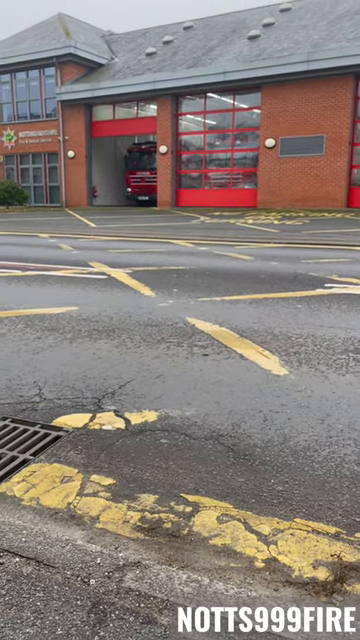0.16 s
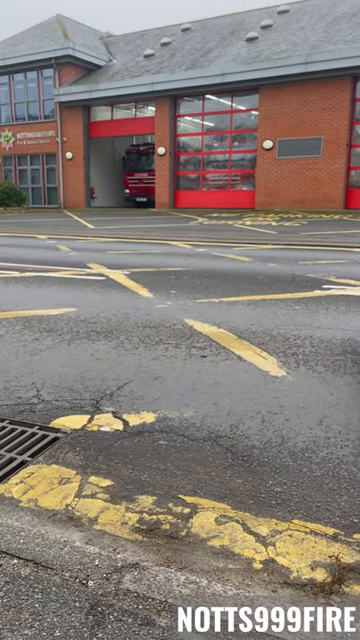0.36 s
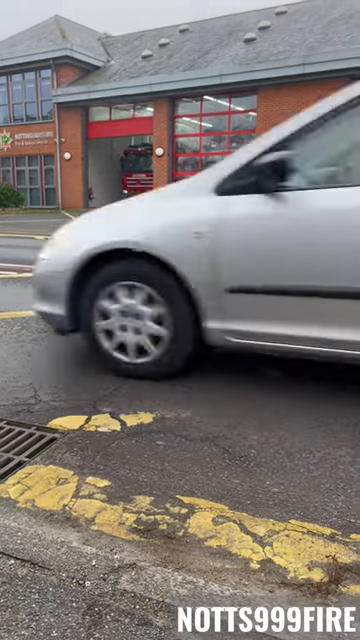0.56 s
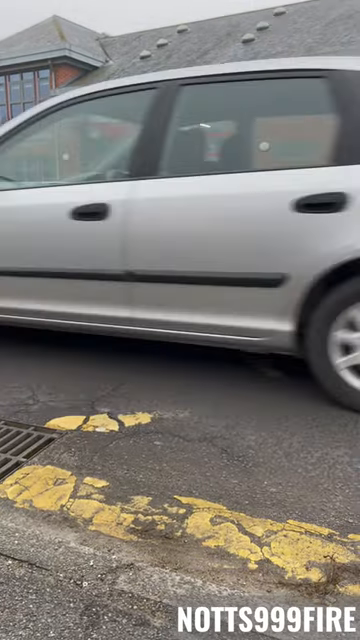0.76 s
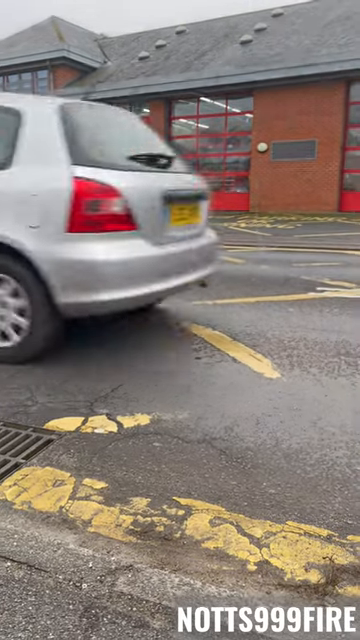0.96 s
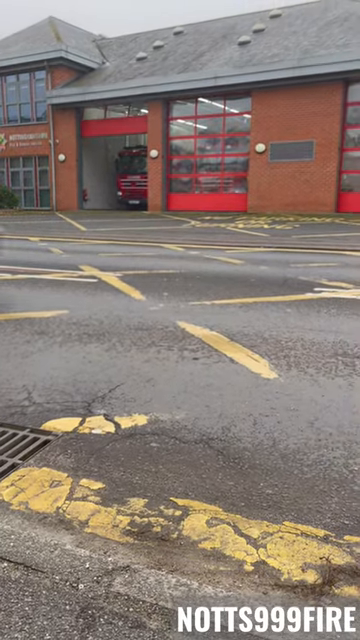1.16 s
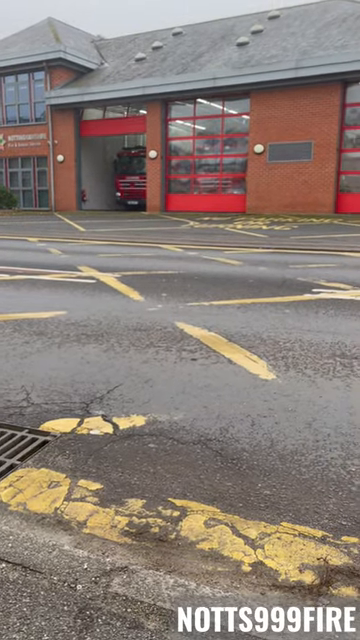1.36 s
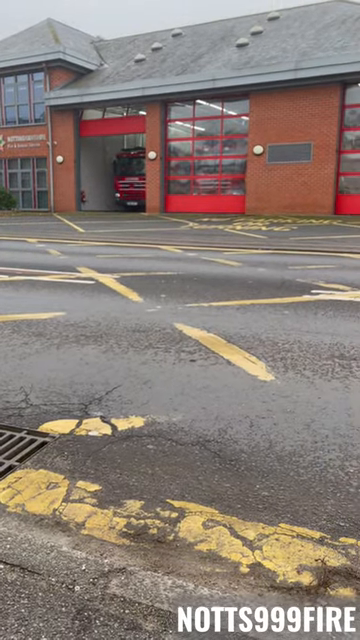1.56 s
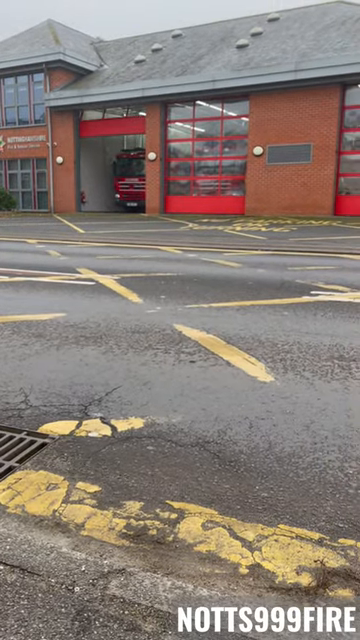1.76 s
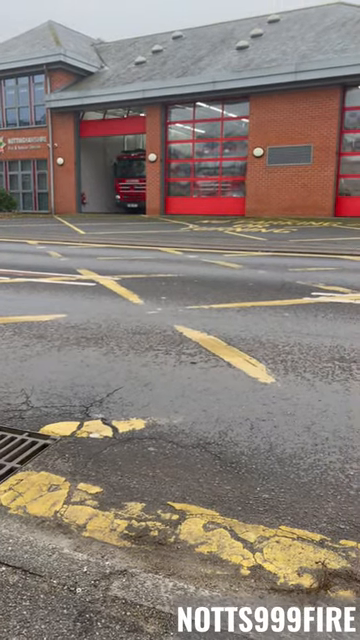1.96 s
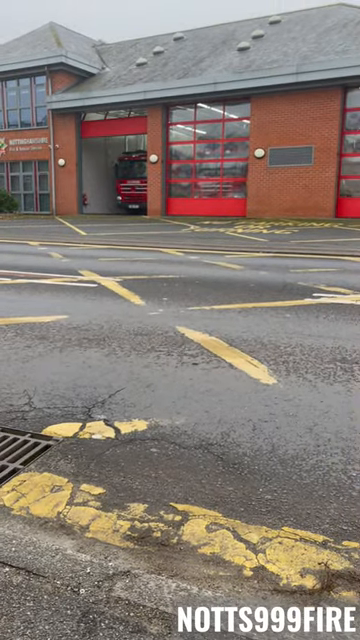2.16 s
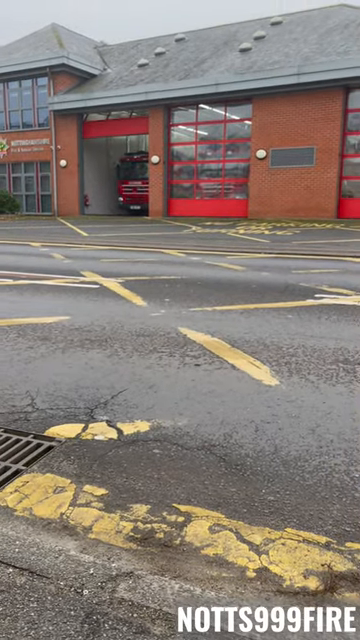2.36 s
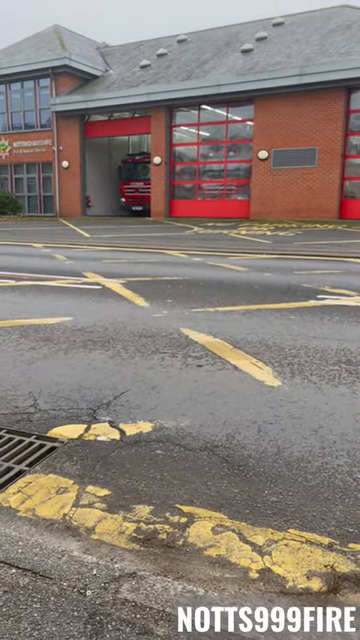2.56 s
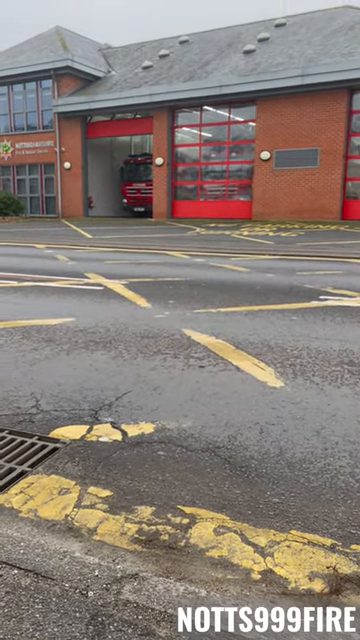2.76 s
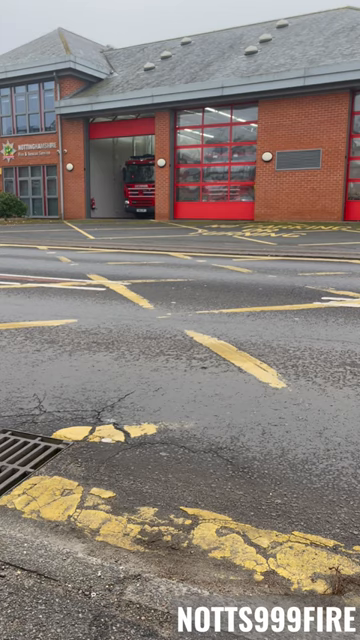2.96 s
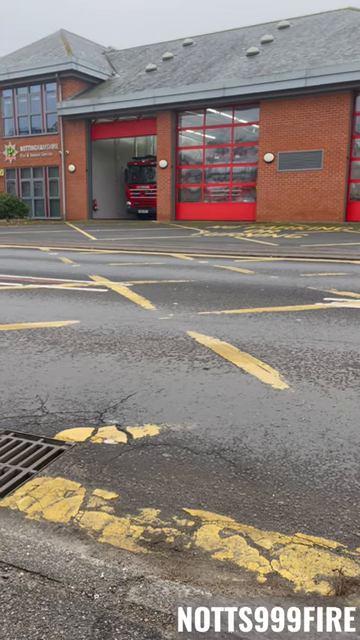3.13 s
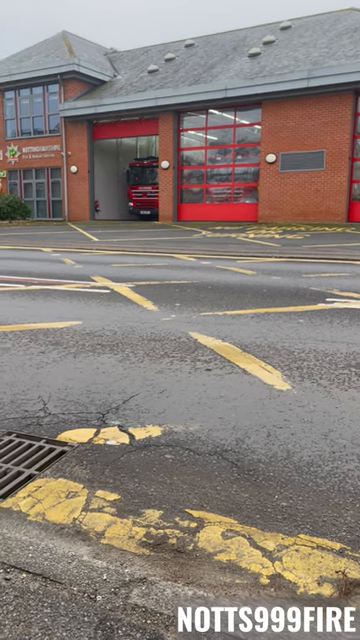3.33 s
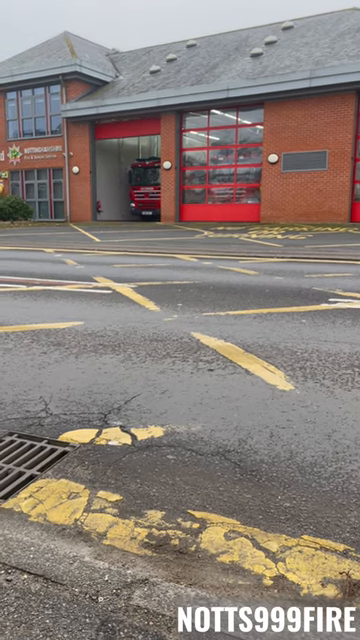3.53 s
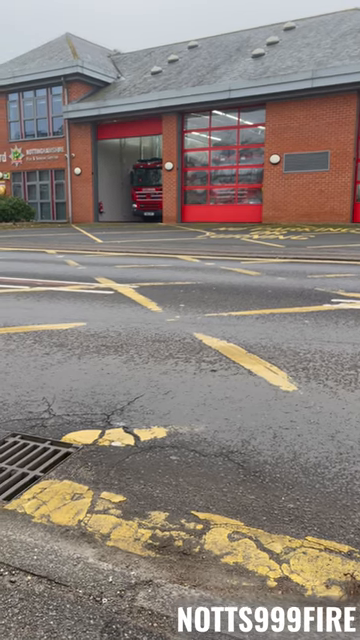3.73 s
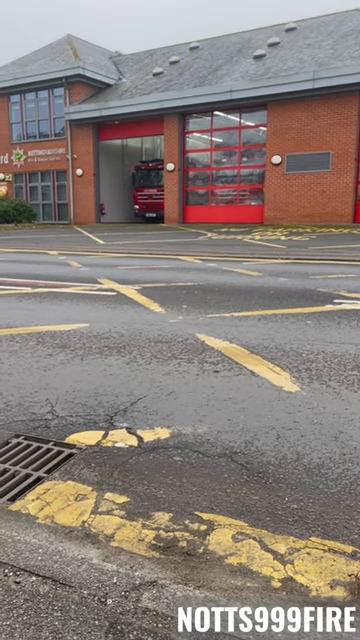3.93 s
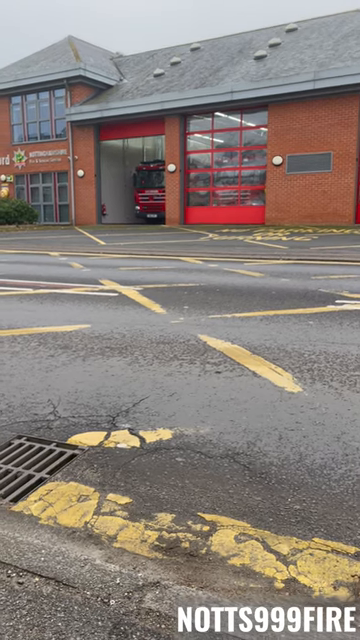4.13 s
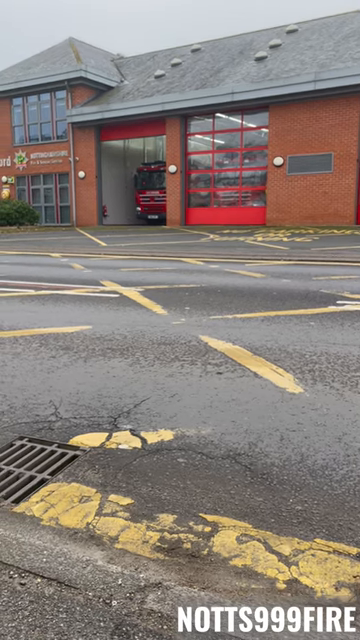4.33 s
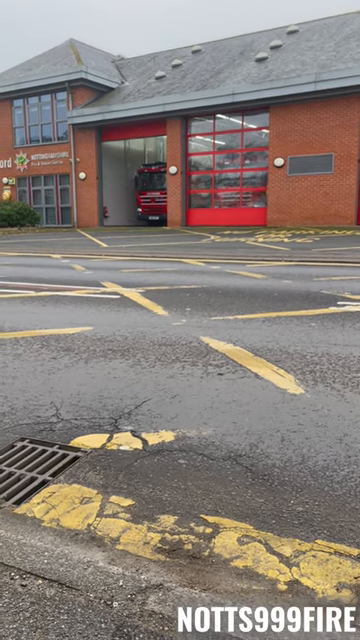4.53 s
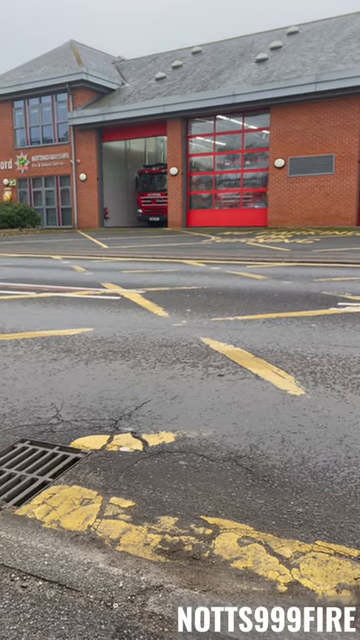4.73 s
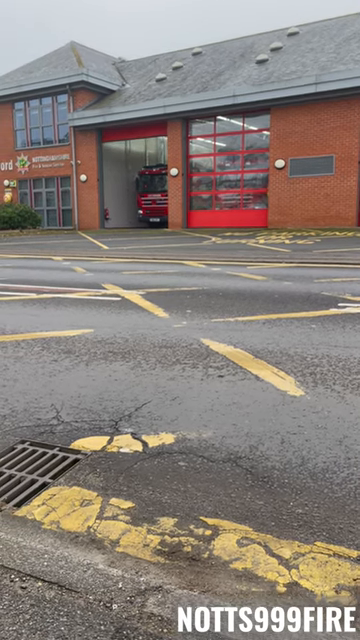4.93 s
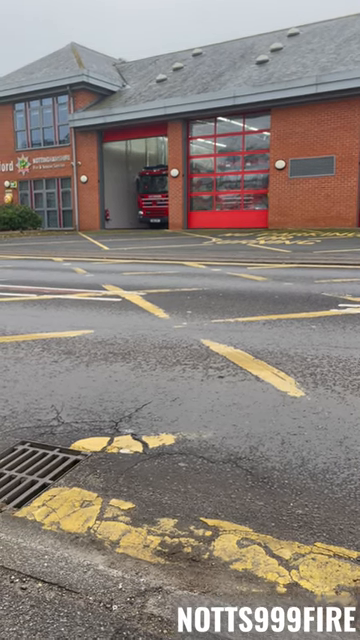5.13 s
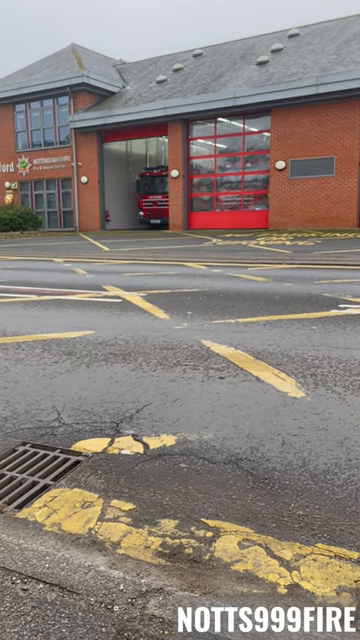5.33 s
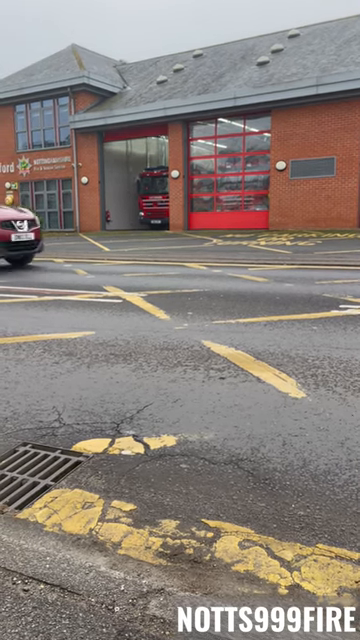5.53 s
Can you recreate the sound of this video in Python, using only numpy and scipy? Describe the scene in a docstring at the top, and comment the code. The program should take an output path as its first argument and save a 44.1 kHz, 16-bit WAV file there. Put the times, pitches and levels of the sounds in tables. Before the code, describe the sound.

A wet roadside in stereo, with steady far traffic underneath. At about 0.5 s a car passes very close, from the right towards the centre: broad tyre roar, body rumble, singing tread, fine spray and swishes that brighten as it leaves by 1.5 s. A tyre slap sounds near 1.6 s, with occasional tiny grit ticks. A low, almost pure engine drone around 50 Hz comes in uneven swells, strongest about 2.4 s, fading by 3 s. A fire engine's diesel across the road becomes clearer, clattering with low rumble. A faint, thin airy whistle shows around 3.5-4 s, leaning left. A dull thud lands at 3.7 s; at 4.2 s the air brake spits sharply with clunks and clustered booming thuds. A thin squeal near 7 kHz glides down, flutters and echoes from 4.3 to 5.2 s, with more thuds. Another car's wet roar grows to the end at 5.6 s.

```python
"""A car passes close on a wet road, from the right to straight ahead: tyre noise bands and spray.
A low engine drone (near-pure tone) comes in swells. Across the road a fire engine's diesel clatters in its bay:
noise pulsed by the firings, plus low notes. Its air brake spits and clunks (short noise bursts), thuds boom
(decaying sines), and the brakes squeal thinly (a gliding tone with echoes).
Steady traffic noise lies behind, and another car draws near."""
import sys
import numpy as np
from scipy import signal
from scipy.fft import rfft, irfft, next_fast_len
from scipy.io import wavfile

SR = 44100
rng = np.random.default_rng(int(sys.argv[2]) if len(sys.argv) > 2 else 0)


def materialize(psi):
    """Save the field psi as 16-bit PCM at rate SR to the path in sys.argv[1].

    A 1-D psi becomes a single channel; in a 2-D psi each row is a channel.
    """
    bounded = np.clip(np.atleast_2d(psi).T, -1, 1)
    quanta = np.round(bounded * 32767).astype(np.int16)
    wavfile.write(sys.argv[1], SR, quanta)


N = 246519
TIME = np.arange(N) / SR
SIZE = next_fast_len(N + 2000)
HZ = np.maximum(np.arange(SIZE // 2 + 1) * SR / SIZE, 1)

# car position: time_s, right_share (1 = far right, 0 = straight ahead)
CAR_RIGHT_SHARE = [(0, 1), (.45, .95), (.8, .4), (1.1, .12), (1.6, 0)]
# swell and fade of each part of the car: nearest_s, level_db, half_width_s, loss_db_per_decade of distance
ROAR_PASS = (0.51, -28, 0.49, 30.5)
HISS_PASS = (0.56, -31, 1.05, 84.5)
BODY_PASS = (0.68, -27.5, 0.83, 65)
SPRAY_PASS = (0.5, -44.5, 0.79, 59)
# noise colours of tread roar, tread hiss, body and spray: freq_hz, relative_db
ROAR_COLOUR = [(300, -21), (450, -1.5), (680, -1), (950, 0.5), (1400, -5), (2000, -15)]
HISS_COLOUR = [(900, -26), (1500, -1), (2000, -0.5), (2600, -2.5), (3200, -9.5), (4000, -12.5),
               (4800, -19.5), (7000, -31)]
BODY_COLOUR = [(25, -29), (70, -1), (110, -6), (165, -6.5), (235, -1.5), (305, 4), (400, -11), (700, -12)]
SPRAY_COLOUR = [(2500, -3), (4500, -2), (6200, 1), (8500, -0.5), (10000, 3), (10900, 2.5), (11800, -12),
                (12600, -26)]
# band where the tread sings: time_s, centre_hz
SINGING_PITCH = [(.3, 1060), (.6, 980), (.72, 900), (1.1, 900), (1.45, 1060)]
# its surges: nearest_s, level_db, half_width_s, loss_db_per_decade
SINGING_SURGES = [(.36, -35.5, .16, 38), (.605, -29, 0.04, 37), (.67, -28.5, .045, 37),
                  (.785, -32, .02, 35), (1.05, -35, .025, 35), (1.27, -38, .03, 35),
                  (1.47, -37.5, 0.06, 19)]
# wet swish, brighter as the car draws away: time_s, centre_hz
SWISH_CENTRE = [(.33, 1900), (.49, 1500), (.57, 2050), (.8, 1954), (.97, 2348), (1.12, 2750), (1.35, 3403)]
# wheels swishing past: nearest_s, level_db, half_width_s, loss_db_per_decade
SWISH_SURGES = [(.335, -33, 0.038, 40), (.5, -30, 0.046, 51), (.572, -30, .028, 49), (.78, -35, 0.076, 40),
                (.95, -33, 0.12, 41)]
# shading of sound from the right by the microphone body: freq_hz, left_minus_right_db
RIGHT_BALANCE = [(150, -.3), (330, -1.3), (650, -4.5), (1100, -6), (1550, -1.2), (1900, 0), (2350, 5),
                 (2750, 1), (3500, -2), (4700, -3.5), (5500, 0)]
# phase of sound from the right: freq_hz, left_lead_rad
RIGHT_LEAD = [(150, -.1), (350, -.35), (520, -.85), (950, -1), (1250, -.7), (1600, -.25), (2000, -.3),
              (2400, -1.1), (2900, -1.3), (3600, -1), (5000, 0)]


def near_car(grain=0.16, crackle=0.37):
    """Tread roar and hiss, body rumble and spray off wet tyres, each falling with distance."""
    right, = in_time(CAR_RIGHT_SHARE)
    splashes = droplets(per_s=3100, size_db=3.0, decay_s=0.0011) - 1
    roar = passing(*ROAR_PASS) * noise(ROAR_COLOUR, band=(500, 1400))
    hiss = passing(*HISS_PASS) * (1 + crackle * splashes) * noise(HISS_COLOUR, band=(1600, 3500))
    body = passing(*BODY_PASS) * noise(BODY_COLOUR, band=(130, 420))
    spray = passing(*SPRAY_PASS) * (1 + grain * splashes) * noise(SPRAY_COLOUR, band=(5500, 7500))
    singing = tyre_band(SINGING_PITCH, SINGING_SURGES, width_hz=140.0)
    swish = tyre_band(SWISH_CENTRE, SWISH_SURGES, width_hz=450.0)
    car = roar + singing + hiss + swish + body + spray
    return shaded(right * car, RIGHT_BALANCE, at_hz(RIGHT_LEAD)) + (1 - right) * car


# drone pitch: time_s, pitch_hz
DRONE_PITCH = [(0, 54), (.7, 57), (.95, 55.3), (1.44, 54), (1.6, 51.4), (2.05, 52), (2.7, 52.7), (3.15, 55),
               (3.7, 47), (5.0, 50)]
# drone in swells, loudest about 2.4 s, faint from 2.95 s: time_s, level_db
DRONE_SWELLS = [(0, -28), (.38, -24.5), (.48, -26), (.54, -35), (.61, -25), (.85, -21), (1.25, -25),
                (1.41, -23), (1.6, -26.5), (1.9, -32.5), (1.99, -23.5), (2.3, -20), (2.5, -20), (2.78, -30),
                (2.95, -42), (3.15, -35), (4.0, -36), (4.7, -45), (5.3, -40), (5.59, -41)]
# low burble: loudest_s, level_db, half_width_s, loss_db_per_decade
BURBLE_SWELL = (2.5, -39.5, 0.74, 32)
# burble noise: freq_hz, relative_db
BURBLE_COLOUR = [(125, -2), (168, 2), (200, -1.5), (265, -1), (325, -3), (380, -10)]


def engine_drone(second_db=-7.5, third_db=-15.0, waver_db=1.14, richest_s=0.73, dulling_db_per_s=32.0):
    """Low, nearly pure tone in swells; two overtones sound only around richest_s, and a burble swells later."""
    pitch_hz, = in_time(DRONE_PITCH)
    drone_db, = in_time(DRONE_SWELLS)
    angle = 2 * np.pi * turns(pitch_hz * (1 + 0.0033 * drift(6.1)))
    first, second, third = np.sin(np.outer([1, 2, 3], angle))
    richness = from_db(-dulling_db_per_s * np.abs(TIME - richest_s))
    overtones = from_db(second_db + 2 * drift(2.1)) * second + from_db(third_db) * third
    drone = from_db(drone_db + waver_db * drift(2.6)) * (first + richness * overtones)
    return drone + passing(*BURBLE_SWELL) * noise(BURBLE_COLOUR)


# tyre slaps in wet patches: start_s, level_db, decay_s
PUDDLE_SLAPS = [(.565, -38, .03), (1.575, -30.5, 0.021)]


def puddles():
    """Water pressed out of the tread: brief bursts of tread-coloured hiss."""
    return bursts(PUDDLE_SLAPS, HISS_COLOUR, rise_s=0.0055)


# stone ticks: start_s, relative_db
GRIT_TICKS = [(.6175, -16), (.999, -27), (1.494, -24), (3.376, -22.5), (4.659, -28)]
# tick noise: freq_hz, relative_db
TICK_COLOUR = [(2500, -12), (5000, -1), (6500, 0), (8500, 3), (10000, 2), (12000, -10)]


def grit(level_db=-10.5, decay_s=0.0017):
    """Small stones tick on the road: very short bright bursts."""
    ticks = [(start_s, relative_db + level_db, decay_s) for start_s, relative_db in GRIT_TICKS]
    return bursts(ticks, TICK_COLOUR, rise_s=.0002)


# diesel speed: time_s, firing_rate_hz
DIESEL_FIRING_RATE = [(0, 35.2), (2.4, 34), (3.5, 34.4), (4.1, 32.5), (4.5, 33.3), (5.1, 33.6),
                      (5.59, 32.2)]
# diesel under load: time_s, clatter_db, rumble_db, notes_db
DIESEL_LOAD = [(0, -52.5, -41, -42), (2.6, -49.5, -41.5, -43), (2.9, -47, -39.5, -41),
               (4.0, -44, -34.5, -39.5), (5.0, -42.5, -36, -38), (5.37, -43, -40.5, -33.5),
               (5.59, -42, -38, -36)]
# exhaust notes: firing_rate_multiple, relative_db
DIESEL_NOTES = [(2, 1), (3, 0.5), (5, -9.5), (6, -13), (8, -11.5)]
# clatter and exhaust rumble noise: freq_hz, relative_db
CLATTER_COLOUR = [(600, -21), (1500, -6), (2600, 1.5), (3900, 2), (5000, -5), (6300, -3.5), (7500, -3),
                  (8800, -11.5), (10600, -2), (11800, -22), (13000, -84)]
RUMBLE_COLOUR = [(25, -12), (50, -10), (75, -0.5), (105, -3), (135, -6.5), (180, -6.5), (300, -16.5),
                 (600, -22.5)]
# shading of sound from the bay by the microphone body: freq_hz, left_minus_right_db
BAY_BALANCE = [(1900, 0), (2300, 0), (2900, 9), (3700, -1), (4400, 3), (4900, 0), (5500, 1.5), (5900, 0)]


def diesel():
    """Each firing knocks and bay echo fills the gaps; the exhaust adds wavering low notes and a rumble."""
    rate_hz, = in_time(DIESEL_FIRING_RATE)
    clatter_db, rumble_db, notes_db = in_time(DIESEL_LOAD)
    knocks = firing_knocks(knock_s=0.0099, rise_s=0.004, uneven_db=3.0, between=0.54)
    clatter = shaded(from_db(clatter_db) * knocks * noise(CLATTER_COLOUR), BAY_BALANCE)
    notes = 0
    for multiple, relative_db in DIESEL_NOTES:
        angle = 2 * np.pi * (multiple * turns(rate_hz) + rng.random()) + 0.63 * drift(7.1)
        gain = from_db(relative_db + notes_db + 3.1 * drift(4.2))
        notes = notes + np.sqrt(2) * gain * np.sin(angle)
    return clatter + notes + from_db(rumble_db) * noise(RUMBLE_COLOUR)


def firing_knocks(knock_s, rise_s, uneven_db, between):
    """Envelope of diesel firings, each of its own strength, over a steady share; rms 1."""
    rate_hz, = in_time(DIESEL_FIRING_RATE)
    firings = turns(rate_hz)
    number = firings.astype(int)
    age_s = firings % 1 / rate_hz
    strength = from_db(uneven_db * rng.standard_normal(size=400))[number]
    knocks = between + strength * (1 - np.exp(-age_s / rise_s)) * np.exp(-age_s / knock_s)
    return knocks / np.sqrt(np.mean(knocks ** 2))


# valve spits: start_s, level_db, decay_s
AIR_SPITS = [(4.1685, -17, 0.0015), (4.1735, -32, 0.004), (4.1812, -26, 0.004), (4.1845, -19.5, 0.0055),
             (4.1985, -22, 0.0035), (4.2065, -28, .003), (4.207, -40.5, 0.052), (4.2445, -33, .002)]
# linkage clunks: start_s, level_db, decay_s
LINKAGE_CLUNKS = [(4.171, -22, 0.03), (4.19, -27.5, 0.035)]
# spit and clunk noise: freq_hz, relative_db
SPIT_COLOUR = [(1200, -13), (2500, 3), (3300, -9), (4500, 0), (5400, -5.5), (6500, 1), (8000, 5.5),
               (9300, -8), (10100, 11.5), (11200, 5.5), (12200, 3)]
LINKAGE_COLOUR = [(200, -3), (550, 1.5), (800, -1), (1250, -3.5), (1700, -15), (4000, -18)]


def brake_release(sputter=0.48):
    """Air sputters from the valve in sharp spits and the linkage clunks."""
    rough = 1 + sputter * (droplets(per_s=2500, size_db=1.0, decay_s=.0005) - 1)
    air = shaded(rough * bursts(AIR_SPITS, SPIT_COLOUR, rise_s=0.00067), BAY_BALANCE)
    return air + bursts(LINKAGE_CLUNKS, LINKAGE_COLOUR, rise_s=0.0035)


# dull thuds in the bay: start_s, level_db, decay_s, boom_tilt_db_per_octave
BAY_THUDS = [(3.712, -19.5, 0.027, -15), (4.1973, -19, 0.035, 1), (4.2315, -22.5, 0.044, 1),
             (4.268, -21, 0.037, -2.5), (4.352, -23.5, 0.038, -3), (4.409, -27, 0.035, -9),
             (4.765, -20.5, 0.034, -5), (4.985, -26.5, 0.037, 2)]
# low notes set booming: freq_hz, relative_db
BAY_MODES = [(85, 1.5), (112, -5), (150, -8), (176, -4.5), (238, -6)]
# rattle noise: freq_hz, relative_db
RATTLE_COLOUR = [(40, -9), (70, -4), (130, 1), (175, 1.5), (245, -3), (310, -8), (400, -12), (800, -15)]


def thuds(boom_db=-0.5, rattle_db=-6.0, rise_s=0.0035, uneven_db=1.0):
    """Each thud sets the low notes of the bay booming, with a dull rattle."""
    mode_hz, mode_db = np.transpose(BAY_MODES)
    boom = np.zeros(N)
    for start_s, level_db, decay_s, tilt_db in BAY_THUDS:
        start = int(start_s * SR)
        age_s = TIME[:min(N - start, SR // 2)]
        tilted_db = mode_db + tilt_db * np.log2(mode_hz / mode_hz[0])
        colour_db = tilted_db + uneven_db * rng.standard_normal(len(mode_hz))
        ringing = from_db(level_db + boom_db + colour_db) @ np.sin(2 * np.pi * np.outer(mode_hz, age_s))
        boom[start:start + len(age_s)] += (1 - np.exp(-age_s / rise_s)) * np.exp(-age_s / decay_s) * ringing
    rattle = bursts([row[:3] for row in BAY_THUDS], RATTLE_COLOUR, rise_s)
    return boom + from_db(rattle_db) * rattle


# squeal drops as the shoes seat, lifts as they come free: time_s, pitch_hz
SQUEAL_GLIDE = [(4.315, 7540), (4.35, 7540), (4.405, 7100), (4.5, 7080), (4.6, 6998), (5.0, 6985),
                (5.08, 7100), (5.22, 7260)]
# shoes grab harder or slip: time_s, extra_db, width_s (standard deviation)
SHOE_GRABS = [(4.39, 7.5, 0.0075), (4.48, 8, 0.032), (4.556, 12, 0.018), (4.592, -6, 0.0087),
              (4.645, 2, 0.019), (4.69, -9, 0.0058), (4.935, 3.5, .045), (4.998, -12, 0.012),
              (5.042, 11, .016)]


def squeal(flutter_db=2.5, jitter=0.0012, echo_db=-14.0):
    """One gliding friction tone swells at each grab; echoes off the station walls beat against it."""
    pitch_hz, = in_time(SQUEAL_GLIDE)
    rubbing = swell(start_s=4.314, length_s=0.81, level_db=-45, attack_s=0.0068, release_s=.07)
    grab_db = sum(db * np.exp(-.5 * ((TIME - s) / width_s) ** 2) for s, db, width_s in SHOE_GRABS)
    gain = rubbing * from_db(grab_db + flutter_db * drift(35.6))
    tone = gain * np.sin(2 * np.pi * turns(pitch_hz * (1 + jitter * drift(87.5))))
    echoes = []
    for port in range(2):
        lags_s = rng.uniform(0.019, 0.083, size=4)
        echoes.append(sum(np.interp(TIME - lag_s, TIME, tone) for lag_s in lags_s))
    return np.sqrt(2) * (tone + from_db(echo_db) * np.array(echoes) / 2)


# thin whistle: start_s, length_s, level_db
WHISTLE_NOTES = [(3.47, 0.24, -55), (3.78, 0.038, -52)]
# breathy hiss around it: loudest_s, level_db, half_width_s, loss_db_per_decade
BREATH_SWELL = (4, -57, 0.96, 42)


def whistle(width_hz=43.0, hiss_width_hz=280.0, pan_db=12.5, attack_s=.05, release_s=.035):
    """A thin, unsteady high note and its hiss pulse with the diesel, mostly on the left."""
    notes = sum(swell(*row, attack_s, release_s) for row in WHISTLE_NOTES) * narrow_noise(4856, width_hz)
    hiss = passing(*BREATH_SWELL) * narrow_noise(4640, hiss_width_hz)
    chop = firing_knocks(knock_s=.008, rise_s=.004, uneven_db=2.0, between=.08)
    return from_db(pan_db * np.array([[.5], [-.5]])) * chop * (notes + hiss)


# next car, still nearing: nearest_s, level_db, half_width_s, loss_db_per_decade
NEXT_ROAR_PASS = (5.5, -36, 0.9, 17.5)
NEXT_HISS_PASS = (6, -37.5, 0.59, 18.5)
# far tyres and next car's wet tread: freq_hz, relative_db
FAR_COLOUR = [(22, -12), (45, 8.5), (130, 4.5), (200, 4), (310, 3), (380, 0), (550, -1.5), (900, 2),
              (1200, -3), (1550, -7.5), (2300, -9.5), (3300, -18), (5000, -26), (10500, -52)]
NEXT_HISS_COLOUR = [(400, 1.5), (1000, 0), (1400, -1.5), (1850, 3.5), (2600, -5), (3600, -17), (5000, -33),
                    (10700, -19.5), (12500, -35)]
# next car's swish: time_s, centre_hz
NEXT_SWISH_CENTRE = [(5.08, 1900), (5.25, 1750), (5.59, 1848)]
# its surges: nearest_s, level_db, half_width_s, loss_db_per_decade
NEXT_SWISH_SURGES = [(5.1, -43, .025, 45), (5.3, -40.5, 0.062, 45), (5.55, -41, 0.028, 45)]


def traffic(steady_db=-41.0, crackle=0.27):
    """Far tyres merge into a smooth roar; the next car grows out of it, brighter and wet."""
    roar_gain = np.hypot(from_db(steady_db), passing(*NEXT_ROAR_PASS))
    roar = roar_gain * noise(FAR_COLOUR, band=(500, 1400))
    splashes = droplets(per_s=1800, size_db=4.0, decay_s=0.001) - 1
    hiss = passing(*NEXT_HISS_PASS) * noise(NEXT_HISS_COLOUR, band=(1600, 3000))
    swish = tyre_band(NEXT_SWISH_CENTRE, NEXT_SWISH_SURGES, width_hz=280.0)
    return roar + (1 + crackle * splashes) * (hiss + swish)


def tyre_band(pitch, surges, width_hz):
    """A gliding band of tyre noise that surges as wheels go by."""
    centre_hz, = in_time(pitch)
    gain = np.sqrt(sum(passing(*row) ** 2 for row in surges))
    return gain * narrow_noise(centre_hz, width_hz)


def passing(nearest_s, level_db, width_s, loss_db):
    """Gain that swells and fades like a source moving past at steady speed, falling with its distance."""
    distance = np.hypot(1, (TIME - nearest_s) / width_s)
    return from_db(level_db - loss_db * np.log10(distance))


def swell(start_s, length_s, level_db, attack_s, release_s):
    """Gain that rises, holds and dies away exponentially."""
    age_s = np.maximum(TIME - start_s, 0)
    rise = 1 - np.exp(-age_s / attack_s)
    return from_db(level_db) * rise * np.exp(-np.maximum(age_s - length_s, 0) / release_s)


def bursts(events, colour, rise_s):
    """Puffs of one noise colour that rise fast and die away; their powers add."""
    power = np.zeros(N)
    for start_s, level_db, decay_s in events:
        age_s = np.maximum(TIME - start_s, 0)
        fall = np.exp(-np.minimum(age_s / decay_s, 20))
        power += (from_db(level_db) * (1 - np.exp(-age_s / rise_s)) * fall) ** 2
    return np.sqrt(power) * noise(colour)


def droplets(per_s, size_db, decay_s):
    """Envelope of countless tiny decaying splashes of uneven size; rms 1."""
    sizes = from_db(size_db * np.minimum(rng.exponential(1, N), 4))
    drops = (rng.random(N) < per_s / SR) * sizes
    splashes = signal.lfilter([1], [1, -np.exp(-1 / (decay_s * SR))], drops + 1e-18)
    return splashes / np.sqrt(np.mean(splashes ** 2))


# likeness of the two microphone ports: freq_hz, likeness_0_to_1
PORT_LIKENESS = [(60, .997), (130, .993), (250, .985), (500, .93), (1000, .93), (1800, .94), (2600, .6),
                 (3800, .76), (4700, .62), (5900, .98), (7000, .85), (8200, .88), (9000, .99), (10500, .85),
                 (12000, .99)]


def noise(spectrum, band=None):
    """Coloured noise at both ports, fading beyond the spectrum's ends; rms 1 within the band."""
    first_hz, last_hz = spectrum[0][0], spectrum[-1][0]
    gain = from_db(at_hz(spectrum))
    gain = gain / (1 + (HZ / last_hz / 1.3) ** 6) / (1 + (first_hz / HZ / 1.3) ** 6)
    low_hz, high_hz = band or (0, SR)
    gain = gain / np.sqrt(np.mean(gain ** 2 * (HZ > low_hz) * (HZ < high_hz)))
    alike = np.clip(at_hz(PORT_LIKENESS), 0, 1)
    mid, side = rfft(rng.standard_normal((2, SIZE)))
    both = np.sqrt((1 + alike) / 2) * mid + np.sqrt((1 - alike) / 2) * side * [[1], [-1]]
    return irfft(gain * both, SIZE)[:, :N]


def narrow_noise(hz, width_hz):
    """Noise gathered round a centre that may move; rms 1."""
    angle = 2 * np.pi * turns(hz * np.ones(N))
    return drift(width_hz) * np.sin(angle) + drift(width_hz) * np.cos(angle)


def drift(corner_hz):
    """Slow random wander: low-passed noise of spread 1."""
    slow = irfft(rfft(rng.standard_normal(SIZE)) / (1 + (HZ / corner_hz) ** 2), SIZE)[:N]
    return slow / slow.std()


def shaded(sound, balance, phase_rad=0):
    """Tips each frequency towards one port, in level and in phase."""
    tip = (at_hz(balance) * np.log(10) / 20 + 1j * phase_rad) * [[.5], [-.5]]
    return irfft(rfft(sound, SIZE) * np.exp(tip), SIZE)[:, :N]


def turns(hz):
    """Cycles done so far at a moving rate."""
    return np.cumsum(hz) / SR


def from_db(db):
    """Decibels to gain."""
    return 10 ** (np.asarray(db) / 20)


def in_time(rows):
    """Each column of a time curve, at every sample."""
    time_s, *columns = np.transpose(rows)
    return [np.interp(TIME, time_s, column) for column in columns]


def at_hz(points):
    """A table over log frequency, read at every bin."""
    freq_hz, value = np.transpose(points)
    return np.interp(np.log(HZ), np.log(freq_hz), value)


def scene():
    """The road in front, the fire engine in its bay opposite."""
    road = near_car() + engine_drone() + puddles() + grit() + traffic()
    fire_engine = diesel() + whistle() + brake_release() + thuds() + squeal()
    return road + fire_engine


# phase between the two ports: freq_hz, left_lead_rad
PORT_LEAD = [(300, 0), (600, .2), (1500, .05), (2000, .2), (2500, .7), (2900, .85), (3600, .55), (4200, .6),
             (4700, 2.3), (5200, 5.1), (5700, 6.2), (6300, 6.5), (8550, 9.35), (9500, 9.5), (11000, 11.1),
             (11700, 12.4), (12500, 12.57)]
CUTOFF_HZ = 12000


def record(dry):
    """The two ports part in phase towards the treble; a steep low-pass cuts the top."""
    lead = np.exp(1j * at_hz(PORT_LEAD) * [[.5], [-.5]])
    ports = irfft(rfft(dry, SIZE) * lead, SIZE)[:, :N]
    low_pass = signal.cheby1(10, .3, CUTOFF_HZ, fs=SR, output="sos")
    return signal.sosfilt(low_pass, ports)


dry = scene()
out = record(dry)
materialize(out)
```